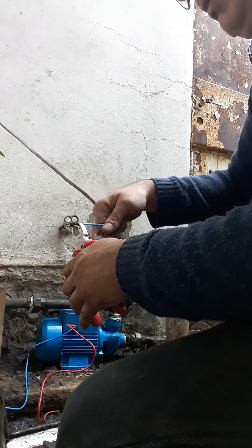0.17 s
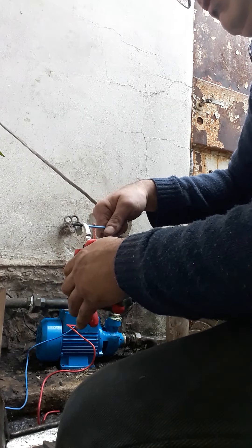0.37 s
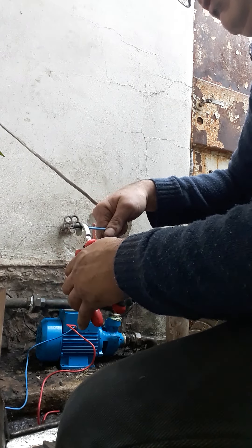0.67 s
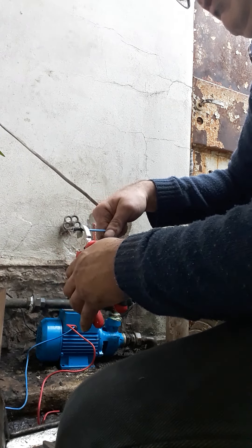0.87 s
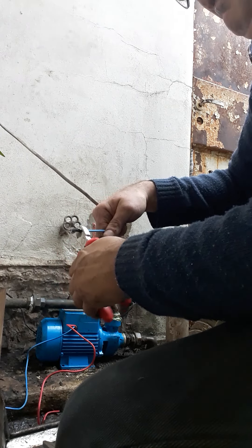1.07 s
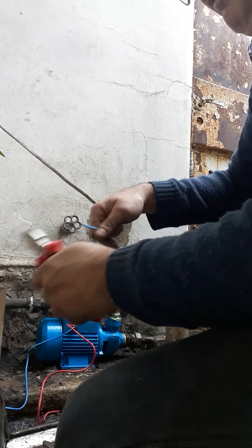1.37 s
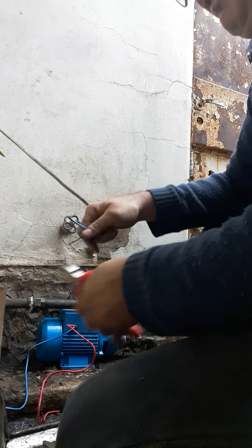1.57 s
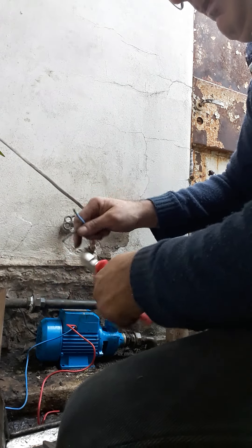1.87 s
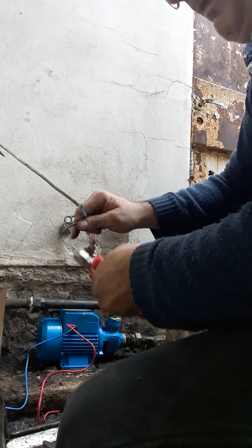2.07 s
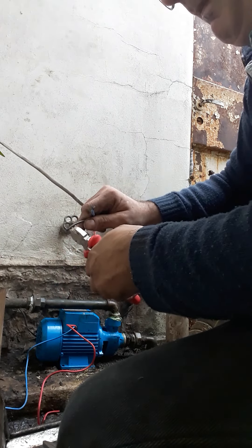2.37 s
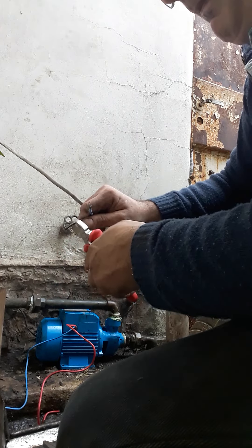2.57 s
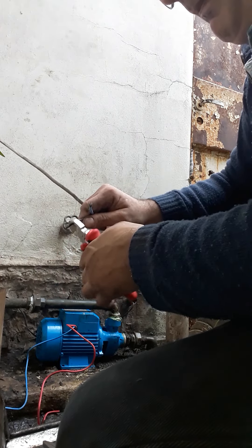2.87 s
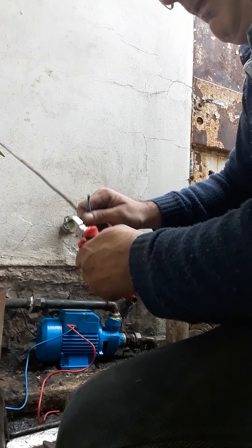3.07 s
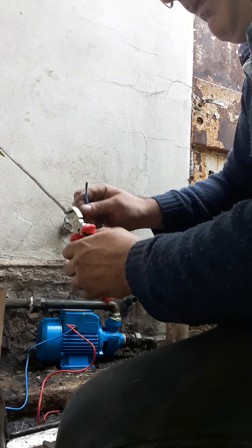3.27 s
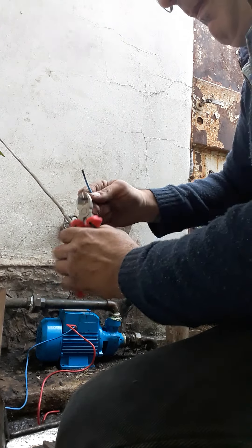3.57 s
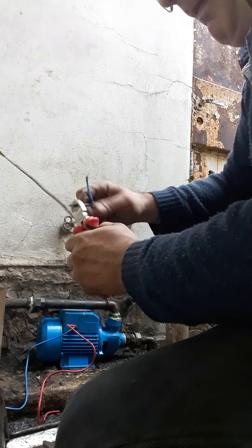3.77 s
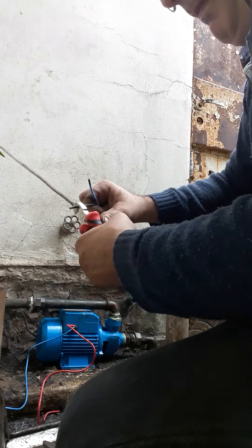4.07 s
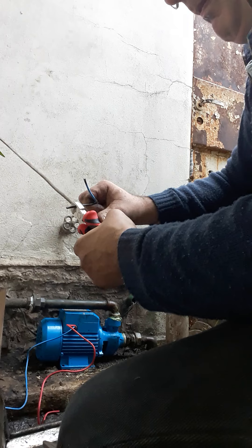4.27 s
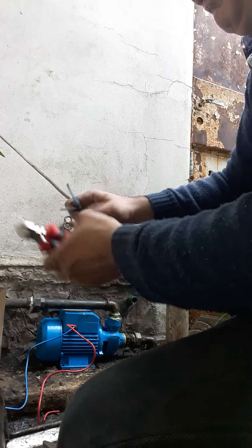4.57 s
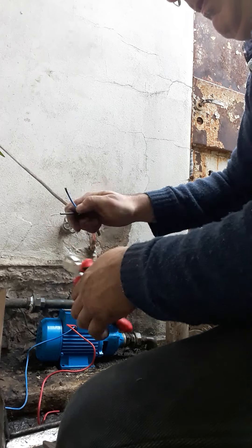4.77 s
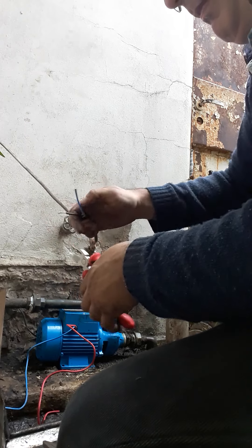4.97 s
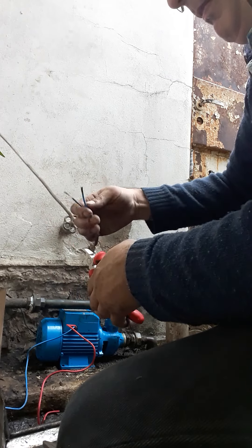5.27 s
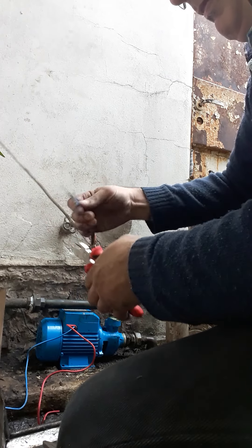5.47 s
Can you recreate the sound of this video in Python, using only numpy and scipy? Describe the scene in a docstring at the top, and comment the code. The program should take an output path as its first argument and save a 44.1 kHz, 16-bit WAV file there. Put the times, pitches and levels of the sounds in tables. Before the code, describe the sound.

Distant machinery rumbles and hisses steadily behind close handwork in a walled yard with a short echo. In the first second, fingers scuff lightly along an electrical wire, with a tiny squeak of steel on insulation near 0.2 seconds. At about 1.3 seconds, side cutters cut through with one loud, briefly ringing snap, the loudest sound. Sharp jaw clacks follow at 1.4 and around 1.55 seconds, with dull thumps from the grips. The overall volume dips for about a second, then recovers. A faint squeak and click come at 2 seconds, a soft bite with a thump and squeak at 2.9, some faint scuffs, and another bite at 3.7. From 4.2 to 4.6 seconds the jaws give a run of light clicks, strongest near 4.55 with a squeak. Faint rubbing follows around 5 seconds as the machinery continues.

```python
"""Side cutters snip electrical wire with one loud snap: the wire gives way and the jaws slam shut. Around the
snap, the jaws clack and bite, the grips thump, the hinge and steel squeak and fingers scuff along the wire. The
walled yard echoes it all, and distant machinery rumbles and hisses behind it. A phone close by turns its own
volume down for about a second after the snap."""
import sys
import numpy as np
from scipy import signal
from scipy.fft import rfft, irfft, next_fast_len
from scipy.io import wavfile
from scipy.ndimage import map_coordinates

SR = 44100
rng = np.random.default_rng(int(sys.argv[2]) if len(sys.argv) > 2 else 0)


def waveform_to_disk(signal):
    """Save audio, clipped to [-1, 1], as 16-bit WAV at the path in sys.argv[1]."""
    frames = np.transpose(np.atleast_2d(signal))
    scaled = np.clip(frames, -1, 1) * 32767
    samples = np.round(scaled).astype(np.int16)
    wavfile.write(sys.argv[1], SR, samples)


N = 248283

# Tone colours of the background. Each row: frequency in Hz, relative level in dB.
RUMBLE_COLOUR = [(15, -46), (25, -32), (41, -18), (92, -0.5), (167, -6), (205, 1.5), (241, -2.5),
                 (273, -8.5), (369, -10.5), (439, -19), (475, -16), (612, -18.5), (752, -18), (1100, -18.5),
                 (1430, -35), (2420, -120)]
HISS_COLOUR = [(650, -27), (1100, -11), (1230, -6.5), (1670, 1), (2160, -17), (2460, -16), (2890, -12.5),
               (3210, -17), (3430, -30), (3770, -31), (4830, -16.5), (5640, -32.5), (6800, -24.5),
               (7670, -33.5), (8500, -45.5), (11000, -68.5), (18700, -120)]
AIR_COLOUR = [(5000, -39.5), (8500, -18), (9350, -16.5), (11100, -7), (15100, -6), (16000, -0.5)]
# The yard's echo. Each row: frequency in Hz, fade time in seconds (the time to drop by 60 dB).
ECHO_FADES = [(300, .33), (1700, 0.27), (5000, 0.24), (14000, 0.23)]
# Tone colours of the handwork. Each row: frequency in Hz, relative level in dB.
SCUFF_COLOUR = [(1500, -19), (2900, 8.5), (3800, -3.5), (4800, 3), (6700, 3.5), (8500, -8), (12000, -4.5),
                (15500, -5)]
GRIP_COLOUR = [(100, -16), (280, -3), (550, -9), (1000, -7.5), (1600, -10), (4000, -70)]
KNOCK_COLOUR = [(400, -25), (1000, -17), (1350, -1.5), (1700, 5), (2300, -9.5), (2950, -0.5), (3600, -16),
                (4900, 0), (5700, -5.5), (6500, -3.5), (8600, -21.5), (12200, -16), (14000, -21),
                (15500, -21.5)]
SNAP_COLOUR = [(600, -39), (1050, -25), (1360, -5.5), (1700, 6.5), (1980, -8), (2600, -26.5), (3000, -6),
               (3450, -19), (4850, -7.5), (5400, -14.5), (7000, -18.5), (8300, -27.5), (13500, -24),
               (15500, -26)]
# Rubs along the wire. Each row: start in seconds, level in dB, drop from slip to slip in dB.
SCUFFS = [(0.085, -52.5, 3), (0.403, -47.5, 10), (0.536, -42, 7.5), (1.058, -51, 16), (2.998, -58.5, 2.5),
          (3.45, -52.5, 3.5), (3.83, -53.5, 12), (4.91, -54.5, -1)]
# Squeaks. Each row: start in seconds, level in dB, length in seconds, pitch in Hz, glide as a share of it.
SQUEAKS = [(0.16, -24.5, 0.015, 2935, -.035), (0.162, -40, .016, 6720, -0.14),
           (1.095, -40.5, 0.037, 2460, 0.68), (2.0, -27, 0.013, 2925, 0.062),
           (2.908, -30.5, 0.0095, 2900, 0.094), (3.807, -46.5, .008, 5465, -.015),
           (4.545, -29.5, 0.018, 2240, -0.017), (4.546, -35, 0.017, 2920, 0.05),
           (5.146, -46, .01, 4900, 0.045)]
# The firmest squeezes. Each row: start in seconds, level in dB.
THUMPS = [(1.5285, -33), (1.5587, -33), (2.891, -34.5), (4.548, -39)]
# A hit's four bands: body, ring, edge and crack. Each row: lowest and highest frequency in Hz.
BANDS = [(350, 2100), (2100, 3900), (3900, 7600), (7600, 17000)]
# How strong each kind of hit is in those bands. Each list: body, ring, edge and crack in dB.
CLACK_BALANCE = [-2.5, 0.5, 1, -10.5]
BITE_BALANCE = [3, -29, -3, -5.5]
SNAP_BALANCE = [-6, -6.5, -5.5, -22]
# Notes of the cutters and taut wire. Each row: pitch in Hz, relative level in dB, fade time in seconds.
STEEL_NOTES = [(1410, -9, .2), (1518, -4, .22), (1622, -3, .22), (1718, 0, .22), (1858, -5, .2),
               (2116, -11, .15), (2970, -11, .15), (3105, -11, .15), (4298, -14, .12), (4695, -7, .15),
               (4948, -7, .16), (6560, -16, .1)]
# Jaws on bare steel (clacks) and on insulation (bites).
# Each row: start in seconds, level in dB, hardness in dB per band, fade time in seconds.
CLACKS = [(0.159, -42.5, -1, 0.085), (1.4052, -17, -4.5, 0.031), (1.5295, -19, 3.1, 0.061),
          (1.5587, -18, 4.5, 0.0052), (1.6265, -44, 5.5, .037), (1.999, -42, -5, 0.043),
          (4.2085, -45, -10.5, 0.04), (4.3591, -43.5, -2.5, 0.12), (4.3975, -41.5, 0, 0.057),
          (4.412, -40.5, -8, 0.11), (4.5458, -29, 2, .06), (4.5677, -30, 14.5, 0.012),
          (4.6375, -40, -4.5, .02)]
BITES = [(2.89, -37.5, 1.5, 0.18), (3.7042, -33.5, -5.5, 0.053)]
# The snap's two strokes. Each row: start in seconds, level in dB, fade time in seconds.
SNAP_STROKES = [(1.2729, -8.5, 0.055), (1.286, -10.5, 0.098)]


def amp(db):
    """Turn decibels into a volume factor."""
    return 10 ** (np.asarray(db) / 20)


def unit(x):
    """Scale a sound to an average (rms) level of 1."""
    return x / np.sqrt(np.mean(x ** 2) + 1e-20)


def along(table, hz):
    """Read between a table's rows on a log frequency scale."""
    freqs, values = np.transpose(table)
    return np.interp(np.log(hz + 1), np.log(freqs), values)


def filtered(x, response):
    """Turn each frequency up or down by response(hz)."""
    size = next_fast_len(N + SR // 4)
    return irfft(rfft(x, size) * response(np.fft.rfftfreq(size, 1 / SR)), size)[:N]


def noise(colour):
    """Steady noise with a given tone colour."""
    return unit(filtered(rng.standard_normal(N), lambda hz: amp(along(colour, hz))))


def wobble(rate, size=N):
    """A smooth curve through `rate` random points a second."""
    points = rng.standard_normal(4096)
    return map_coordinates(points, [np.arange(size) * rate / SR], mode="wrap")


def click(colour, size=1024):
    """A coloured click that starts sharply and rings afterwards (minimum phase)."""
    gains = amp(along(colour, np.fft.rfftfreq(size, 1 / SR)))
    cepstrum = irfft(np.log(np.maximum(gains, 1e-6)))
    cepstrum[1:size // 2] *= 2
    cepstrum[size // 2 + 1:] = 0
    return irfft(np.exp(rfft(cepstrum)))


def add(track, start, sound):
    """Mix a sound into a track, `start` seconds in."""
    part = track[round(start * SR):][:len(sound)]
    part += sound[:len(part)]


def machinery(rumble_db=-39, hiss_db=-44.5, air_db=-63.5):
    """Distant machinery rumbles and hisses, almost steadily."""
    rumble = amp(rumble_db) * noise(RUMBLE_COLOUR)
    hiss = amp(hiss_db + wobble(3.76) / 2) * noise(HISS_COLOUR)
    return rumble + hiss + amp(air_db) * noise(AIR_COLOUR)


def yard_echo(x, delay_s=0.005):
    """The walls answer with a short echo whose high notes die first."""
    hz, t, spectrum = signal.stft(rng.standard_normal(SR // 2), SR, nperseg=256)
    fade = amp(-60 * t / along(ECHO_FADES, hz)[:, None])
    tail = signal.istft(spectrum * fade, SR, nperseg=256)[1]
    delayed = np.pad(x, (int(delay_s * SR), 0))
    return signal.fftconvolve(delayed, tail / np.linalg.norm(tail))[:N]


def finger_scuffs(gap_s=0.062, swell_s=0.011, fade_s=0.24, grain_db=2.5):
    """Fingers and sleeve rub along the wire, each time in three grainy slips that swell and fade."""
    t, power = np.arange(N) / SR, np.zeros(N)
    for start, db, drop_db in SCUFFS:
        for slip in range(3):
            age = t - (start + slip * gap_s)
            below_peak_db = np.maximum(-10 * age / swell_s, 60 * age / fade_s)
            power += amp(db - slip * drop_db - below_peak_db) ** 2
    friction = unit(noise(SCUFF_COLOUR) * amp(grain_db * wobble(460)))
    return np.sqrt(power) * friction


def squeaks(echo_s=0.014, echo_db=-3, slip_rate=900):
    """The cutters' hinge and the steel on the wire stick and slip in tiny gliding tones; a wall sends each one
    back."""
    out = np.zeros(N)
    for start, db, length, pitch_hz, glide in SQUEAKS:
        roughness = 0.006 + 0.16 * abs(glide)
        progress = np.linspace(0, 1, int(length * SR))
        hz = pitch_hz * (1 + glide * (progress - 0.5))
        hz *= 1 + roughness * wobble(slip_rate, len(progress))
        swell = np.sin(np.pi * progress ** 0.45)
        tone = amp(db) * swell * np.sin(2 * np.pi * np.cumsum(hz) / SR)
        add(out, start, tone)
        add(out, start + echo_s, amp(echo_db) * tone)
    return out


def grip_thumps(fade_s=0.067):
    """The soft grips knock in the palm with a dull sound that dies at once."""
    loudness, t = np.zeros(N), np.arange(SR // 4) / SR
    for start, db in THUMPS:
        add(loudness, start, amp(db - 60 * t / fade_s))
    return loudness * noise(GRIP_COLOUR)


def steel_hits(hits, colour, spike, ring_db):
    """Each hit is a sharp spike and a dying rattle in the jaws; the steel rings on after it."""
    out, t, jaw_click = np.zeros(N), np.arange(SR // 4) / SR, click(colour)
    filters = [signal.butter(3, band, "bandpass", fs=SR, output="sos") for band in BANDS]
    for start, db, balance, fade_s in hits:
        fade = amp(-60 * t / fade_s)
        fade_rms = np.sqrt(np.mean(fade ** 2))
        rattle = rng.standard_normal(len(t)) * fade
        rattle[0] += spike
        rattle = signal.fftconvolve(rattle, jaw_click)[:len(t)]
        for band, band_db in zip(filters, balance):
            add(out, start, amp(db + band_db) * fade_rms * unit(signal.sosfilt(band, rattle)))
        for hz, note_db, ring_s in STEEL_NOTES:
            band_db = balance[sum(hz > top for _, top in BANDS)]  # the band this note lies in
            note = np.sin(2 * np.pi * (hz * t + rng.random())) * amp(-60 * t / ring_s)
            add(out, start, amp(db + band_db + ring_db + note_db + rng.standard_normal()) * note)
    return out


def jaw_knocks(rows, balance):
    """The jaws knock on steel or on muffling insulation; a harder hit sounds brighter."""
    tilt = np.arange(len(BANDS)) - (len(BANDS) - 1) / 2
    hits = [(start, db, np.array(balance) + hardness * tilt, fade_s)
            for start, db, hardness, fade_s in rows]
    return steel_hits(hits, KNOCK_COLOUR, spike=3.2, ring_db=-34)


def wire_snap(gap_s=0.004, drop_db=1.55):
    """The wire gives way, then the jaws slam shut; each stroke chatters in three weakening hits."""
    hits = [(start + k * gap_s, db - k * drop_db, SNAP_BALANCE, fade_s)
            for start, db, fade_s in SNAP_STROKES for k in range(3)]
    return steel_hits(hits, SNAP_COLOUR, spike=3.9, ring_db=-22.5)


def scene(echo_db=-10.5):
    """The handwork, its echo and the distant machinery, in one channel."""
    snap = wire_snap()
    knocks = jaw_knocks(CLACKS, CLACK_BALANCE) + jaw_knocks(BITES, BITE_BALANCE)
    work = snap + knocks + grip_thumps() + finger_scuffs() + squeaks()
    return (work + amp(echo_db) * yard_echo(work) + machinery())[None]


def gain_control(x, threshold_db=-19, depth_db=9, hold_s=1.066, fall_db_per_s=24, rise_db_per_s=22):
    """A loud sound makes the phone slide its volume down, hold it there, then bring it back."""
    size = 441  # samples in each block
    step_s = size / SR
    blocks = x[:N // size * size].reshape(-1, size)
    level_db = 10 * np.log10(np.mean(blocks ** 2, axis=1) + 1e-12)
    wanted_db = -np.clip(2 * (level_db - threshold_db), 0, depth_db)
    span = int(hold_s / step_s)
    recent_db = np.lib.stride_tricks.sliding_window_view(np.pad(wanted_db, (span, 0)), span + 1)
    gain_db = [0]
    for target in recent_db.min(axis=1):
        change = np.clip(target - gain_db[-1], -fall_db_per_s * step_s, rise_db_per_s * step_s)
        gain_db.append(gain_db[-1] + change)
    return x * amp(np.interp(np.arange(N), np.arange(len(gain_db)) * size, gain_db))


def record(dry, top_hz=16000):
    """The phone sets its own volume and drops the very highest sounds."""
    return filtered(gain_control(dry[0]), lambda hz: hz < top_hz)[None]


dry = scene()
out = record(dry)
waveform_to_disk(out)
```